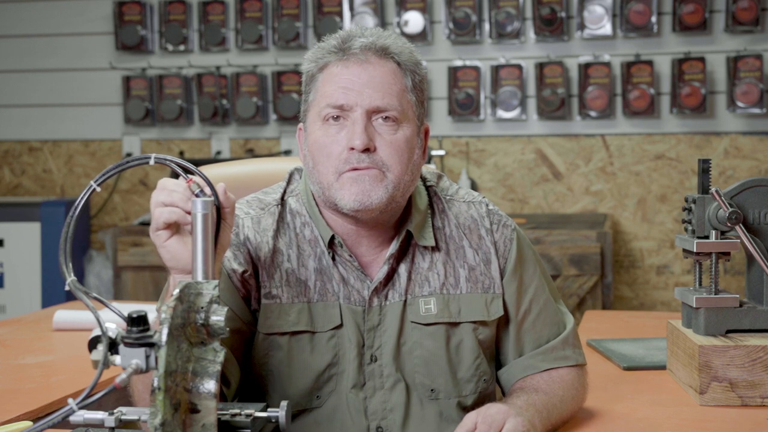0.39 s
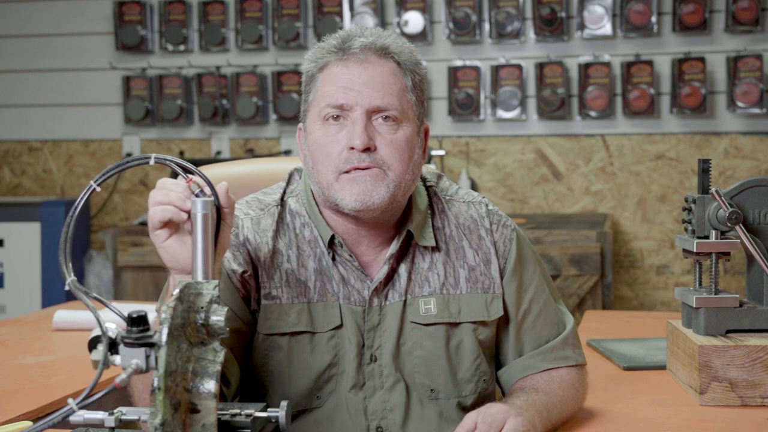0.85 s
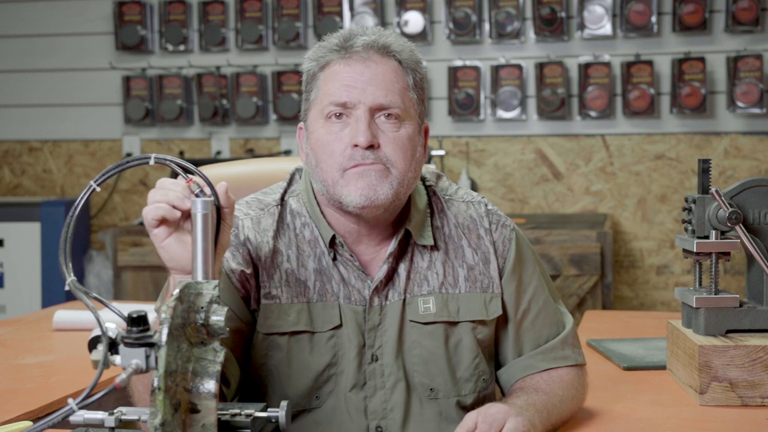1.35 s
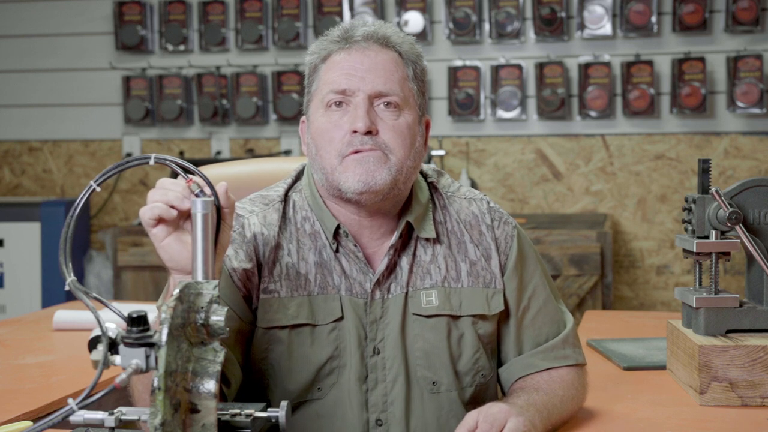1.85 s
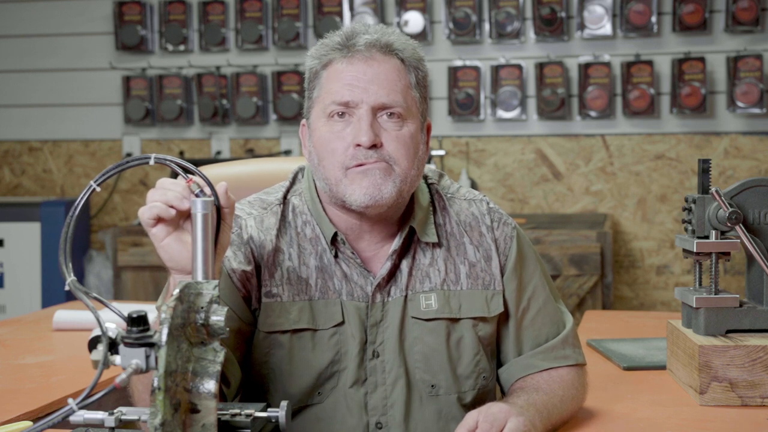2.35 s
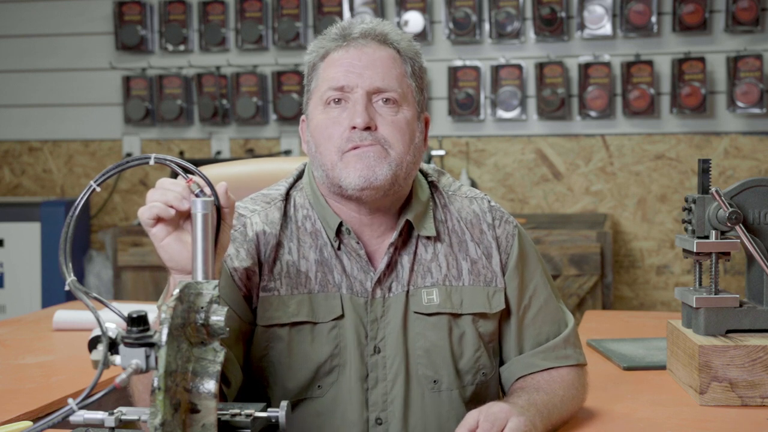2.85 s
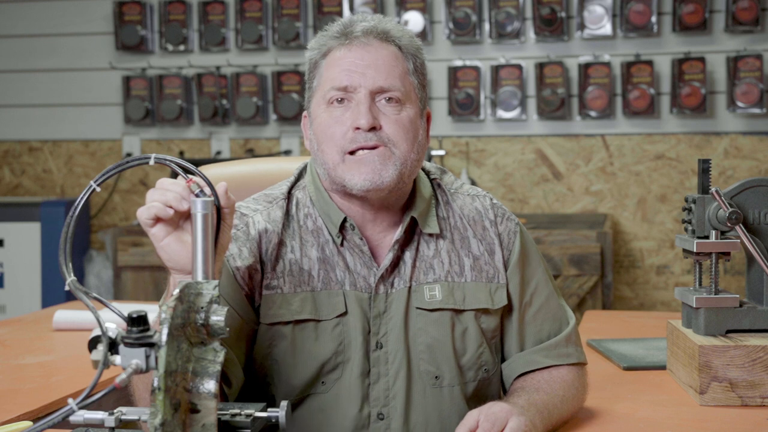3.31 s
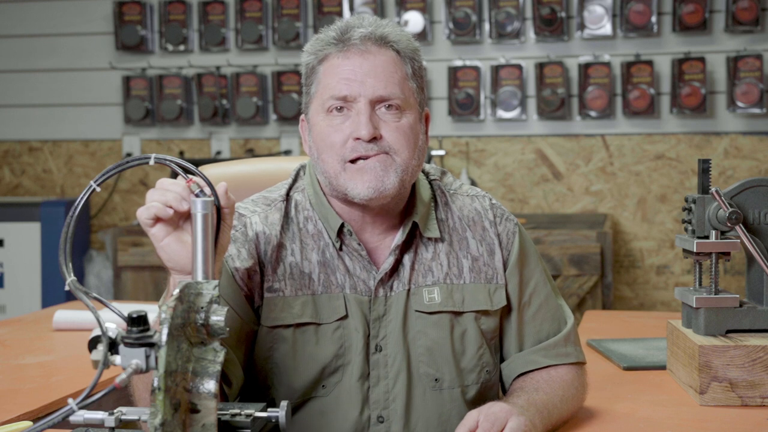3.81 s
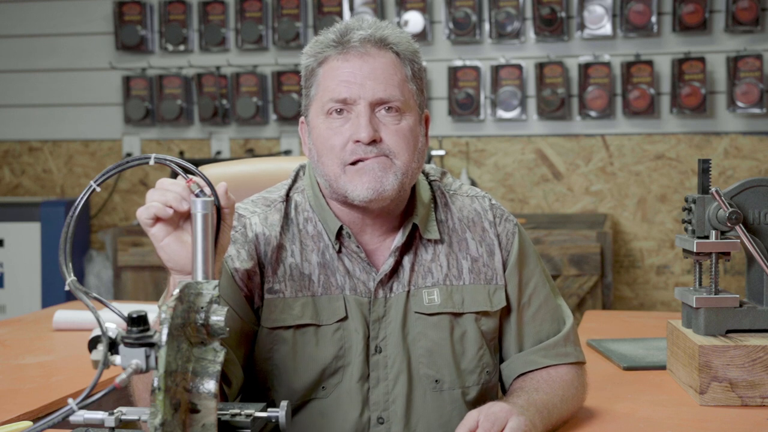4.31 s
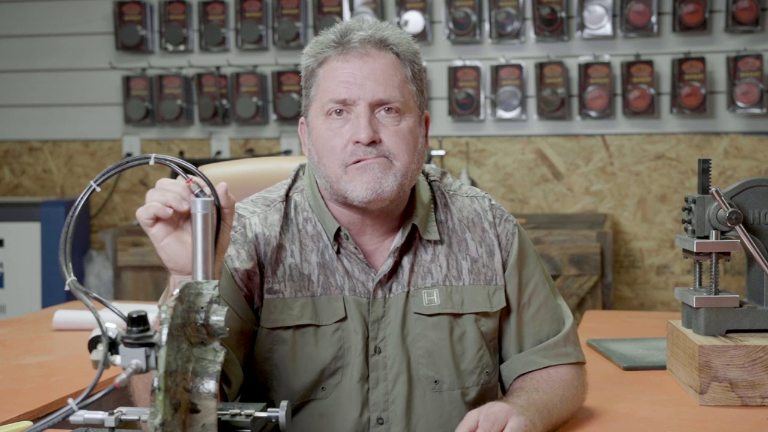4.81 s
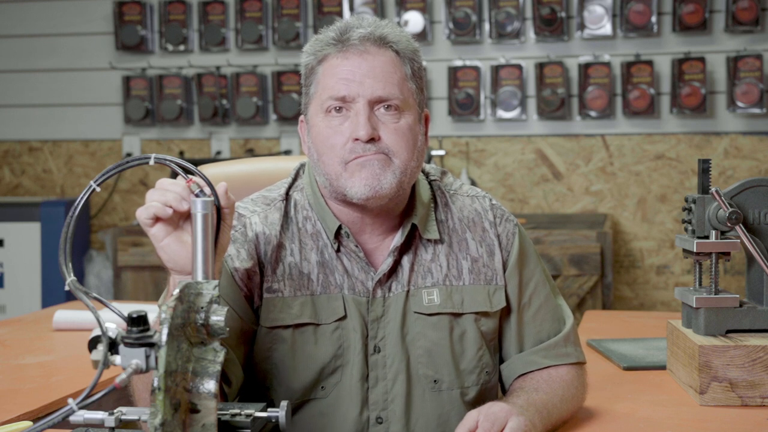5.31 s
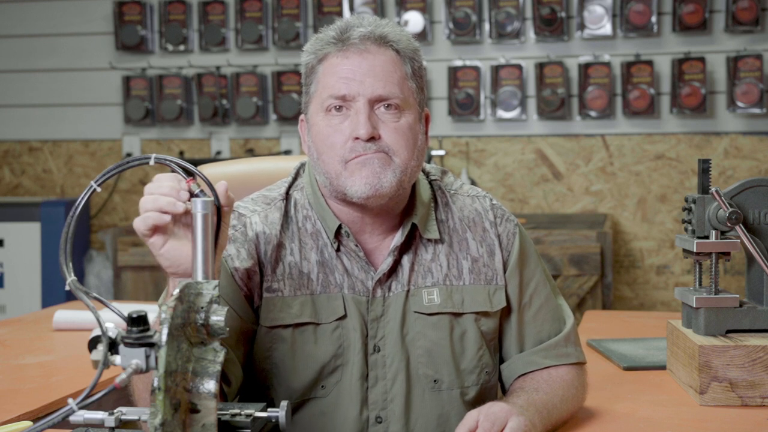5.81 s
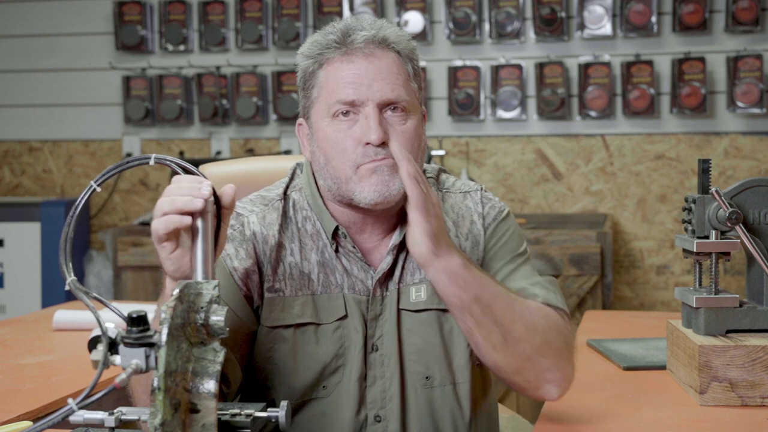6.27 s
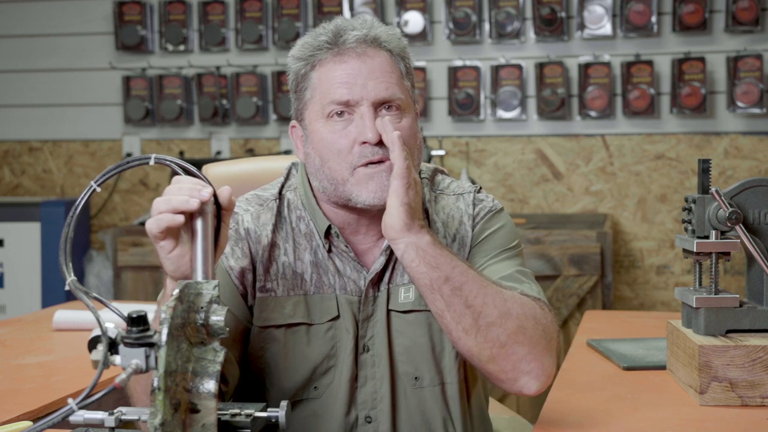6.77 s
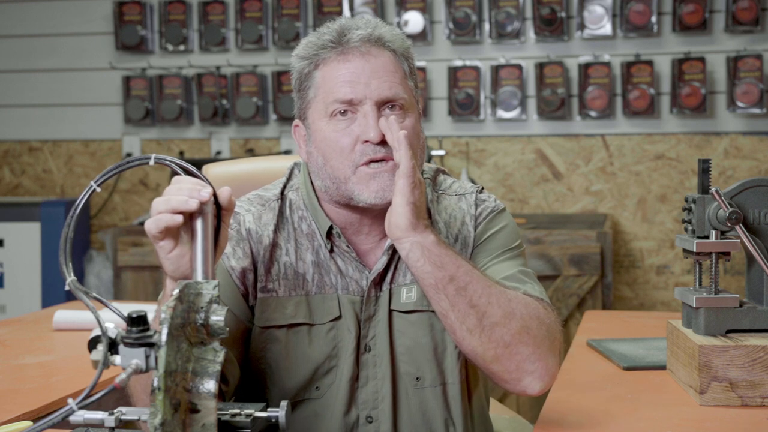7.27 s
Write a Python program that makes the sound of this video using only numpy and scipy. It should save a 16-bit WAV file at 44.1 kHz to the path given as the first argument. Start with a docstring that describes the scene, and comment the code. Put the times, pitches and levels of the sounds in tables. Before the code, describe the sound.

A latex diaphragm call, blown very close to the microphone in a small quiet workshop. Three held, nasal whistles each swell and break into a buzzing rasp, with small wet tongue clicks between them. Then six even yelps, each with a clear high head and raspy tail, and finally five short, hard clucks, so loud that they overload slightly. Short room reverberation, very faint low shop noise.

```python
"""A latex diaphragm call close to an overloading microphone: three held notes, six yelps and five clucks.
Two oscillators beat in the mouth: a reed flaps near 700 Hz, the air pocket before it whistles higher up.
Sum and difference tones and turbulent air pass a mouth resonance that rises as the jaw drops.
Behind it: a faint pip after the first note, small wet tongue clicks, a short workshop reverberation
and the steady filtered noise of a quiet shop."""
import sys
import numpy as np
from scipy import signal
from scipy.fft import rfft, irfft, next_fast_len
from scipy.io import wavfile
from scipy.ndimage import uniform_filter1d

SR = 44100
rng = np.random.default_rng(int(sys.argv[2]) if len(sys.argv) > 2 else 0)


def store_wav(level_fs):
    """Save 16-bit WAV to argv[1]."""
    pcm = np.round(np.clip(np.atleast_2d(level_fs), -1, 1) * 32767)
    wavfile.write(sys.argv[1], SR, pcm.T.astype(np.int16))


def makeup_ratio(level_db):
    """Linear amplitude ratio for a level in decibels (20 dB per factor of ten)."""
    decades = np.asarray(level_db, float) / 20
    return 10 ** decades


N = 326207


def unit(x):
    """Scaled to rms 1."""
    return x / np.sqrt(np.mean(np.abs(x) ** 2) + 1e-20)


def levelled(x, span_s=0.05):
    """Divided by its running rms."""
    size = int(span_s * SR)
    power = uniform_filter1d(uniform_filter1d(x ** 2, size), size)
    return x / np.sqrt(np.abs(power) + 1e-12)


def along(points, hz):
    """(Hz, value) points interpolated on a log frequency axis."""
    f, v = np.transpose(points)
    return np.interp(np.log(hz + 1), np.log(f + 1), v)


def filtered(x, response):
    """x times a complex response of frequency."""
    m = next_fast_len(N + SR // 2)
    return irfft(rfft(x, m) * response(np.fft.rfftfreq(m, 1 / SR)), m)[:N]


def band(x, low_hz, high_hz, order):
    """Zero-phase band-pass; order sets the steepness of both skirts."""
    return filtered(x, lambda f: 1 / (1 + (low_hz / (f + 1)) ** order) / (1 + (f / high_hz) ** order))


def smooth(x, hz):
    """One-pole low-pass."""
    keep = np.exp(-2 * np.pi * hz / SR)
    return signal.lfilter([1 - keep], [1, -keep], x)


def drift(hz):
    """Random wandering of rms 1, mostly slower than hz."""
    return unit(smooth(smooth(rng.standard_normal(N), hz), hz))


def phase(hz):
    """Running phase of a steady or moving frequency given per sample."""
    return 2 * np.pi * np.cumsum(hz) / SR


# Spectrum of the quiet shop. Each row: frequency in Hz, relative density in dB per Hz.
SHOP_SPECTRUM = [(15, -25), (70, -0.5), (130, -5), (250, -6), (600, -9), (1000, -15), (3000, -31),
                 (6000, -72.5), (9000, -120)]


def shop_floor():
    """Steady noise of the shop: white noise through a fixed spectrum."""
    floor_rms_db = -69.5
    noise = filtered(rng.standard_normal(N), lambda f: makeup_ratio(along(SHOP_SPECTRUM, f)))
    return makeup_ratio(floor_rms_db) * unit(noise)


# Reverberation of the shop. Each row: frequency in Hz, t60 in s.
WALL_DECAY = [(200, 0.13), (600, 0.33), (1400, 0.31), (2200, 0.33), (3700, 0.32), (10000, .18)]


def walls(x):
    """The walls answer after 350 samples; each frequency dies at its own speed."""
    hz, t, z = signal.stft(rng.standard_normal(SR // 2), SR, nperseg=256)
    decay = makeup_ratio(-60 * t / along(WALL_DECAY, hz)[:, None])
    tail = signal.istft(z * decay, SR, nperseg=256)[1]
    delayed = np.pad(band(x, 140, 10000, order=2), (350, 0))
    return signal.fftconvolve(delayed, tail / np.linalg.norm(tail))[:N]


# Small wet tongue clicks. Each row: start in s, level in dB before the soft onset, frequency in Hz.
TONGUE_CLICKS = [(1.268, -45.5, 250), (1.582, -53.5, 825), (2.568, -54, 249), (2.898, -78, 847),
                 (6.998, -45, 350)]


def clicks():
    """Each click is a damped sine with a soft onset."""
    t60_s, onset_s = 0.076, 0.0014
    out, t = np.zeros(N + SR), np.arange(SR // 20) / SR
    for start_s, level_db, hz in TONGUE_CLICKS:
        envelope = makeup_ratio(level_db - 60 * t / t60_s) * (1 - np.exp(-t / onset_s))
        out[round(start_s * SR):][:len(t)] += envelope * np.sin(2 * np.pi * hz * t)
    return out[:N]


SHUT_HZ, CLUCK_MOUTH_HZ = 1305, 1766  # mouth resonance at jaw opening 0, and at 1 in clucks


def stages(times, shape, steady, level_db, whistle_hz, open_hz, rasp_more_db=0, treble_more_db=0):
    """One note: rows of (s, whistle Hz, whistle dB, mouth Hz, rasp dB, treble dB, reed, whistle steadiness)."""
    pitch, whistle_db, jaw, rasp_db, treble_db = np.transpose(shape)[1:]
    mouth_hz = SHUT_HZ + jaw * (open_hz - SHUT_HZ)
    return np.transpose([times, whistle_hz * pitch, level_db + whistle_db, mouth_hz,
                         level_db + rasp_db + rasp_more_db,
                         level_db + treble_db + treble_more_db, *np.transpose(steady)])


# Last air after the first note. Columns: start in s, end in s, whistle level in dB, whistle in Hz.
LAST_AIR = (1.175, 1.21, -27, 950)


def pip():
    """A faint, steady whistle on a shut jaw."""
    start_s, end_s, level_db, hz = LAST_AIR
    return np.array([(s, hz, level_db, SHUT_HZ, level_db - 20, level_db - 45, .2, .95)
                     for s in (start_s, end_s)])


# Stages of a cluck. Each row: share of its length, pitch as share of the rise, whistle in dB re note level,
# jaw opening (1 = CLUCK_MOUTH_HZ), rasp in dB and treble in dB re note level.
CLUCK_STAGES = [(0, 0.0038, -10.5, 0.93, -24, -48), (0.199, .35, -1.5, 1.01, -23.5, -40.5),
                (.65, .8, -1.56, 1.1, -11, -35), (1, 1.01, -1.5, 0.95, -12.5, -37.5)]
# Regularity at each stage, soft clucks scale the whistle's. Each row: reed 0-1, whistle 0-1.
CLUCK_STEADY = [(.2, .98), (.2, 1), (.2, .98), (.2, .8)]


def cluck(start, end, level_db, from_hz, rise_hz, loss_db):
    """A short upward chirp that fades by its end; a soft one flutters."""
    firm_db = -6
    times = [start + (end - start) * r[0] for r in CLUCK_STAGES]
    rows = stages(times, CLUCK_STAGES, CLUCK_STEADY, level_db, rise_hz, CLUCK_MOUTH_HZ)
    rows[:, 1] += from_hz
    rows[-1, 2] -= loss_db
    rows[:, 7] *= 1 if level_db > firm_db else .45
    return rows


# Stages of a yelp. Each row: time, pitch as ratio to the note's whistle, whistle in dB re note level,
# jaw opening (1 = the note's open mouth), rasp in dB and treble in dB re note level.
HEAD_STAGES = [(0, .86, -8, .05, -27.5, -43.5), (.035, 1.01, 1.76, 0.397, -14, -33.5),
               (.052, .99, -5, 0.91, -4.5, -29), (.078, .93, -17, 1.01, -3, -27)]  # time in s after the start
BODY_STAGES = [(.25, .91, -17, 0.7535, -7, -32.5), (.65, .92, -4, .15, -9.5, -40),
               (.9, .94, -7, .02, -17.5, -46), (1, .92, -18.5, .02, -27, -57)]  # time as share from head to end
# Regularity at each stage. Each row: reed 0-1, whistle 0-1.
YELP_STEADY = [(.3, .95), (.3, .95), (.35, .85), (.45, .35), (.5, .3), (.6, .45), (.5, .5), (.3, .3)]


def yelp(start, end, *how):
    """A clear head of fixed length, then a raspy body stretched to the end."""
    body = start + HEAD_STAGES[-1][0]
    times = [start + r[0] for r in HEAD_STAGES] + [body + (end - body) * r[0] for r in BODY_STAGES]
    return stages(times, HEAD_STAGES + BODY_STAGES, YELP_STEADY, *how)


# Stages of a held note. Each row: time, pitch as ratio to the note's whistle, whistle in dB re note level,
# jaw opening (1 = the note's open mouth), rasp in dB and treble in dB re note level.
SWELL_STAGES = [(0, .8, -13, 0, -47, -59), (.13, .92, -6, 0, -30.5, -51.5), (.28, 0.95, 0, .05, -23, -36.5)]  # time in s after the start
DROP_STAGES = [(0, 1.01, 0.6, 0.10004, -17, -35.5), (.25, .95, -2, .7, -2, -32),
               (.42, 0.9, -8, 1.17, -2, -30.5), (.7, 1.02, -2, .7, -2, -32.5),
               (1, .94, 1.3, .05, -11.5, -39.5)]  # time as share from jaw drop to shut jaw
END_STAGE = [(1, .88, -9.5, .05, -41, -63)]  # at the end
# Regularity at each stage. Each row: reed 0-1, whistle 0-1.
HELD_STEADY = [(.4, .65), (.5, .72), (.55, .76), (.55, .74), (.3, .3), (.3, .3), (.6, .7), (.5, .88),
               (.3, .95)]


def held(start, drop, shut, end, closing_db, *how):
    """Swell on a shut jaw, jaw drop, closing and release; a weak closing whistle leaves more rasp."""
    swell_s = [start + r[0] for r in SWELL_STAGES]
    drop_s = [drop + (shut - drop) * r[0] for r in DROP_STAGES]
    shape = SWELL_STAGES + DROP_STAGES + END_STAGE
    rows = stages(swell_s + drop_s + [end], shape, HELD_STEADY, *how)
    rows[-2:, 2] += closing_db
    rows[-2:, 4] -= closing_db
    return rows


# Held notes, the first already under way. Each row: start in s, jaw drops in s, jaw shut in s, end in s.
HELD_TIMES = [(-.3, .875, 1.142, 1.154), (1.688, 2.075, 2.41, 2.462), (2.918, 3.215, 3.54, 3.568)]
# How each is blown. Each row: closing whistle in dB over the usual, level in dB, base whistle in Hz,
# mouth in Hz at jaw opening 1, rasp in dB and treble in dB over the usual.
HELD_BLOWN = [(-6.5, -13, 1030, 1635, .6, -1.5), (0, -10.5, 1055, 1830, -1.4, -.6),
              (-3.5, -10, 1065, 1935, 1.5, 1.3)]
# Yelps. Each row: start in s, end in s, level in dB, base whistle in Hz, mouth in Hz at jaw opening 1,
# rasp in dB and treble in dB over the usual.
YELP_NOTES = [(3.762, 4.035, -6, 1249, 1833, 0.57, -1.1), (4.225, 4.456, -5.5, 1187, 1892, 0.58, -1.5),
              (4.663, 4.893, -5, 1225, 1810, 0.4, -1), (5.081, 5.33, -5, 1221, 1805, 0.059, -1.3),
              (5.505, 5.735, -3.5, 1213, 1914, -0.98, -0.6), (5.918, 6.158, -4, 1210, 1790, -0.74, 0)]
# Clucks. Each row: start in s, end in s, level in dB, base whistle in Hz, nominal rise in Hz,
# whistle lost in dB by the end of the last third.
CLUCK_NOTES = [(6.428, 6.462, -11, 1250, 200, 2), (6.597, 6.647, 1, 1200, 199.7, 22.5),
               (6.812, 6.862, 2, 1310, 160.2, 15.5), (7.015, 7.068, 2.5, 1340, 90, 7.5),
               (7.276, 7.328, 2.5, 1170, 279.8, 9)]


def notes():
    """All notes as stage rows, in order of start."""
    played = [pip()]
    played += [held(*when, *how) for when, how in zip(HELD_TIMES, HELD_BLOWN)]
    played += [yelp(*row) for row in YELP_NOTES]
    played += [cluck(*row) for row in CLUCK_NOTES]
    return sorted(played, key=lambda n: n[0, 0])


def playing():
    """The note controls sample by sample, and a gate that opens only while air flows."""
    attack_s, cluck_attack_s, release_s = 0.01, 0.0042, .016
    t, played, air = np.arange(N) / SR, notes(), np.zeros(N)
    for note in played:
        start, end = note[0, 0], note[-1, 0]
        half = (attack_s if start <= YELP_NOTES[-1][0] else cluck_attack_s) / 2
        air += np.interp(t, [start - half, start + half, end, end + release_s], [0, 1, 1, 0])
    s, *columns = np.concatenate(played).T
    s = np.maximum.accumulate(s)
    return [np.interp(t, s, c) for c in columns], np.minimum(air, 1) ** 2


# Moments when the whistle stalls and the reed dominates. Each row: start in s, end in s.
WHISTLE_STALLS = [(0, 0.048), (.132, .19), (0.237, 0.28), (3.834, 3.9), (5.168, 5.225), (6, 6.07)]


def steadiness(reed, whistle):
    """How regular reed and whistle run, and how far the whistle is alive, all 0-1."""
    state = np.array([reed, whistle, np.ones(N)])
    for start, end in WHISTLE_STALLS:
        state[:, round(start * SR):round(end * SR)] = [[.9], [0], [.15]]
    return np.clip(uniform_filter1d(state, SR // 120, axis=1), 0, 1)


def air_pocket(whistle_hz, steady, alive):
    """Whistle and overtone; an unsteady one drops out for milliseconds and spills narrow noise."""
    flutter_hz = 48.02  # centre of the wandering dropout rate
    wobble = np.sin(phase(flutter_hz + 14 * drift(12)))
    holds = 1 / (1 + np.exp(-5 * (.5 * drift(60) + 1.1 * wobble + 5 * steady - 3.05)))
    flutter = unit(smooth(rng.standard_normal(N) + 1j * rng.standard_normal(N), hz=75))
    swing = alive * (np.sqrt(steady) * holds + 1.15 * (1 - steady) * flutter)
    pocket = phase(whistle_hz + 35 * (1 - steady) * drift(30))
    whistle = band(np.sqrt(2) * np.real(swing * np.exp(1j * pocket)), 730, 1650, order=12)
    overtone = makeup_ratio(-27.0) * np.real(swing * np.exp(2j * pocket))
    return whistle, band(overtone, 1300, 2700, order=6)


LIPS_LOOSEN_S = 3.66
# Reed pitch before jaw and scatter. Each row: time in s, frequency in Hz.
REED_PITCH = [(0, 706.6), (2.3, 698), (5.2, 735), (7.4, 719.8)]


def reed(mouth_hz, steady, whistle, push_db):
    """Periodic snaps modulated by whistle pressure (sum and difference tones), and the hiss they pulse."""
    t = np.arange(N) / SR
    # with loose lips the reed slackens as the jaw closes
    slack_hz = .08 * np.minimum(mouth_hz - 1600, 0) * (t > LIPS_LOOSEN_S)
    scatter_hz = 45 * (1 - steady) * drift(151.84)
    cycle = phase(np.interp(t, *np.transpose(REED_PITCH)) + slack_hz + scatter_hz)
    sharp = .75  # 0 = flat, near 1 = narrow pulses
    snaps = (1 - sharp ** 2) / (1 - 2 * sharp * np.cos(cycle) + sharp ** 2)
    push = 1 + 1.18 * np.minimum(makeup_ratio(push_db), 1) * whistle
    tones = unit((snaps - 1) * push)
    hiss = unit(np.sqrt(snaps) * rng.standard_normal(N))
    return tones, (1.05 - steady) * hiss


def mouth(jet, mouth_hz):
    """Moving resonance: shift to zero, low-pass (sharp core on a broad foot), shift back."""
    turn = np.exp(1j * phase(mouth_hz))
    ringing = smooth(jet / turn, hz=100) + .4 * smooth(jet / turn, hz=450)
    return band(np.real(smooth(ringing, hz=500) * turn), 1050, 2600, order=8)


# Resonances of teeth and lips. Each row: centre in Hz, width in Hz of one pass, peak gain in dB.
TIGHT_LIPS = [(3670, 2800, -6.5), (4170, 330, -1), (4510, 170, 2.5), (7520, 870, -9.5), (8800, 240, -10.5),
              (9900, 460, -15.5), (13300, 3700, -22)]  # held notes
LOOSE_LIPS = [(3867, 380, -1), (5630, 870, -10.5), (7920, 1800, -12.5), (8980, 1300, -22),
              (13300, 1200, -31)]  # yelps and clucks


def lips(x, modes):
    """Parallel fixed resonances, each applied twice so that the valleys stay dark."""
    def response(f):
        return sum(makeup_ratio(db) * (1j * f * w / (c * c - f * f + 1j * f * w)) ** 2 for c, w, db in modes)
    return levelled(filtered(x, response))


def bounded(x, reach):
    """The latex can swing only so far: the envelope bends over near its reach."""
    swing = np.abs(signal.hilbert(x, next_fast_len(N))[:N])
    return x / (1 + (swing / reach) ** 4) ** .2


# Colour of the reed's own thrum. Each row: frequency in Hz, relative gain in dB.
THRUM_COLOUR = [(20, -70), (120, -46.5), (230, -34.5), (330, -15.5), (450, -8), (655, -13), (695, -1),
                (1100, 11.5), (1500, 2), (2400, -9), (4000, -69)]


def call():
    """Whistle, reed and their mixing tones through mouth, cheek and lips, with a faint hum."""
    (whistle_hz, whistle_db, mouth_hz, rasp_db, treble_db, *steady), air = playing()
    reed_steady, whistle_steady, alive = steadiness(*steady)
    whistle, overtone = air_pocket(whistle_hz, whistle_steady, alive)
    tones, hiss = reed(mouth_hz, reed_steady, whistle, whistle_db - rasp_db + 12)
    loose = np.arange(N) / SR >= LIPS_LOOSEN_S

    rasp = makeup_ratio(rasp_db) * levelled(mouth(tones + 1.6 * hiss, mouth_hz), span_s=0.02)
    # an open jaw lets the cheek cavity speak
    cheek_db = rasp_db - 20.5 + 0.013 * (mouth_hz - 1600) + 3 * loose
    cheek = makeup_ratio(cheek_db) * levelled(band(tones + 2.2 * hiss, 2350, 3180, order=16))
    treble = np.where(loose, lips(tones + 2.2 * hiss, LOOSE_LIPS), lips(tones + 4 * hiss, TIGHT_LIPS))

    effort_db = np.maximum(rasp_db, whistle_db - 6.0)
    thrum = filtered(tones + 7.5 * hiss, lambda f: makeup_ratio(along(THRUM_COLOUR, f)))
    thrum = makeup_ratio(effort_db - 7) * levelled(thrum, span_s=0.019)
    hum = np.sin(phase(128 + 6 * drift(8))) * np.minimum(makeup_ratio(effort_db + 23.5), 1)

    reach = 1.55 * np.hypot(makeup_ratio(whistle_db), makeup_ratio(rasp_db))
    swung = bounded(makeup_ratio(whistle_db) * whistle + rasp + thrum, reach)
    # what the bound does to the rest stays in the mid band
    body = thrum + band(swung - thrum, 700, 3200, order=10)
    bright = makeup_ratio(whistle_db) * overtone + cheek + makeup_ratio(treble_db) * treble
    return air * (body + bright + makeup_ratio(-71) * hum)


def scene():
    """The call and clicks, their reverberation and the quiet floor."""
    near = call() + clicks()
    return (near + makeup_ratio(-13.5) * walls(near) + shop_floor())[None]


def band_limit(x):
    """A steep low-pass at the top of the band."""
    return signal.sosfilt(signal.butter(12, 15800, fs=SR, output="sos"), x)


def record(dry):
    """The loudest peaks hit the ceiling of the input."""
    ceiling = 1  # full scale
    clipped = dry / (1 + np.abs(dry / ceiling) ** 30) ** (1 / 30)
    return band_limit(clipped)


dry = scene()
out = record(dry)
store_wav(out)
```